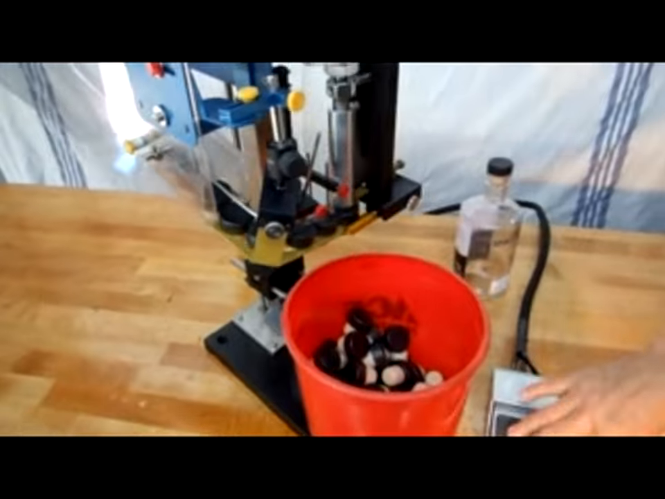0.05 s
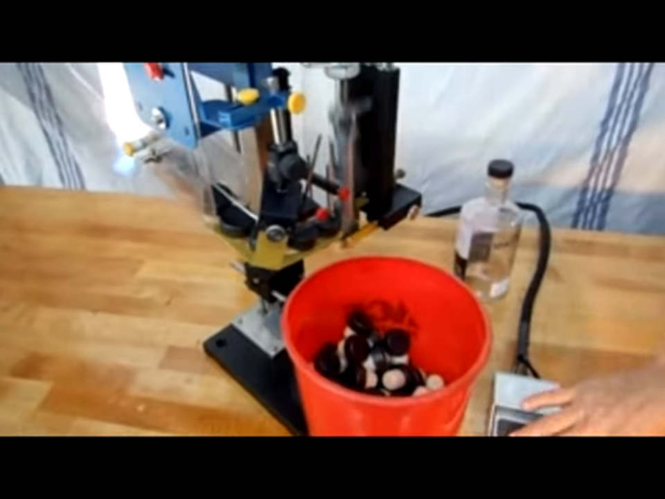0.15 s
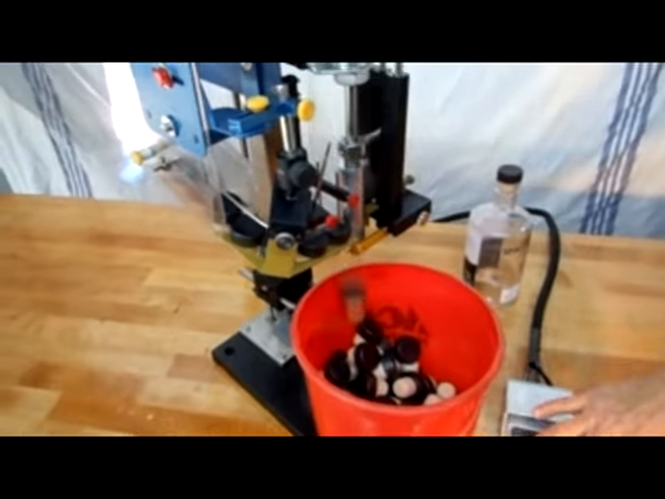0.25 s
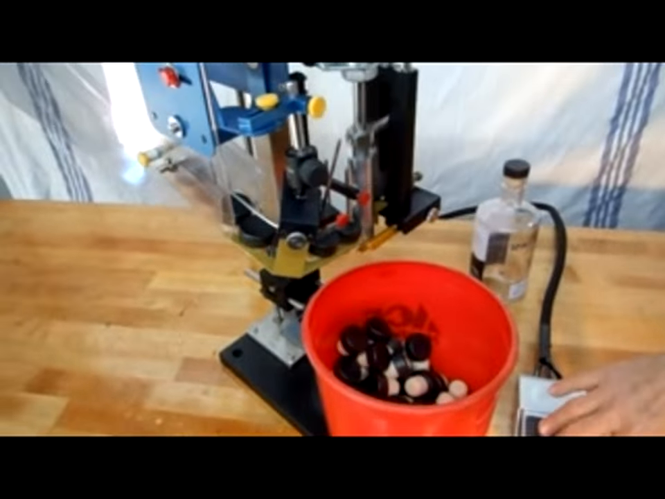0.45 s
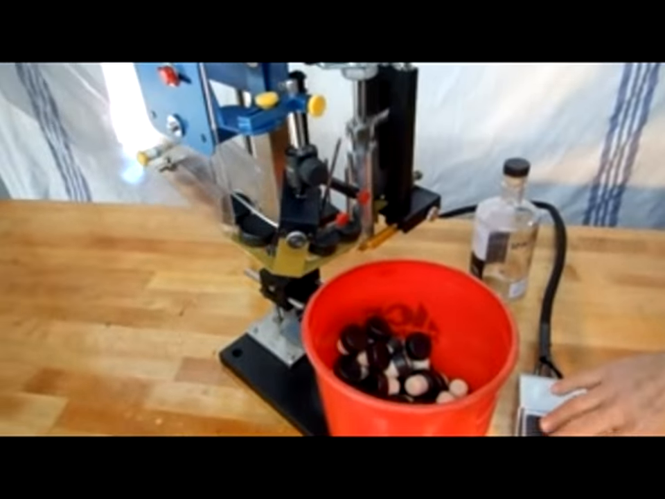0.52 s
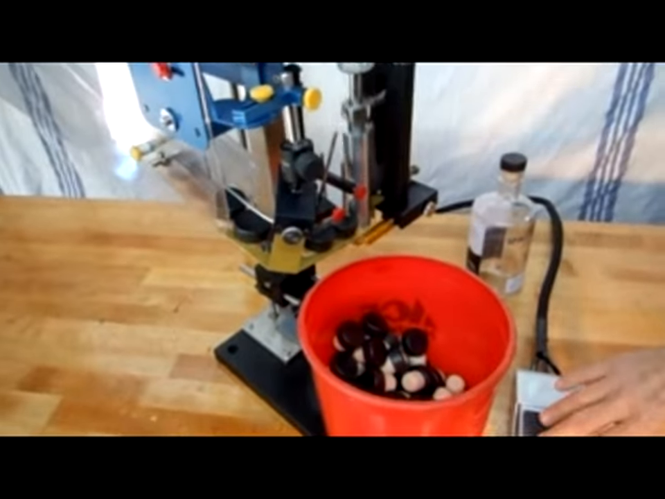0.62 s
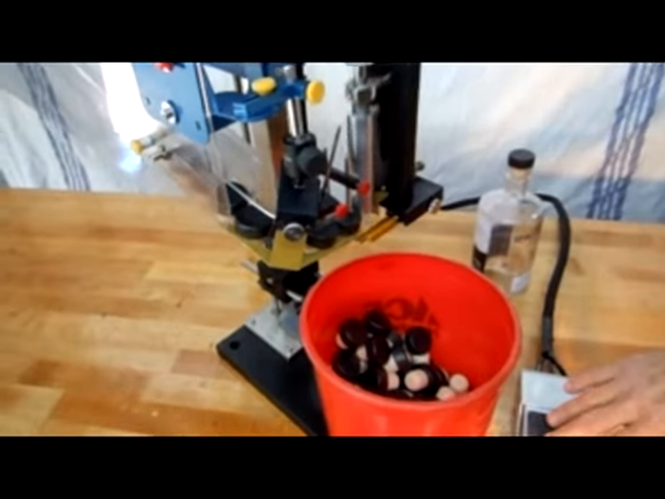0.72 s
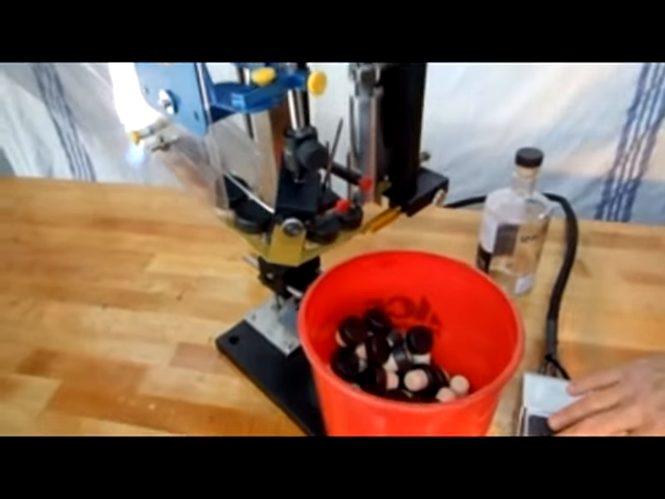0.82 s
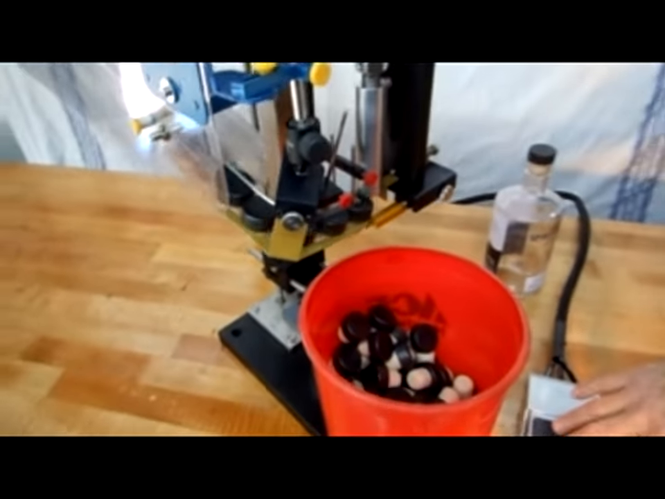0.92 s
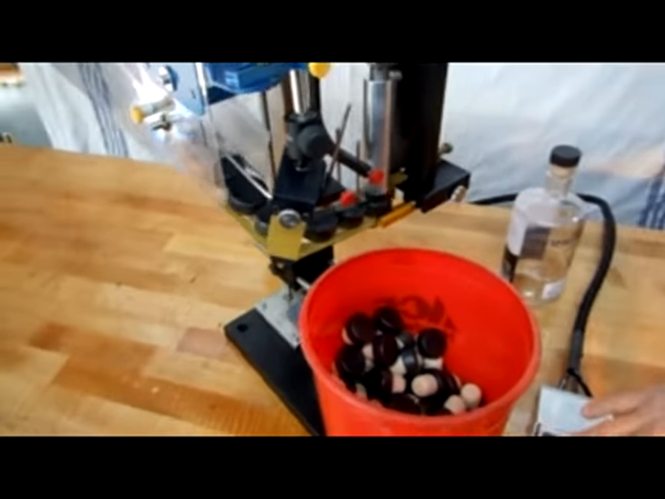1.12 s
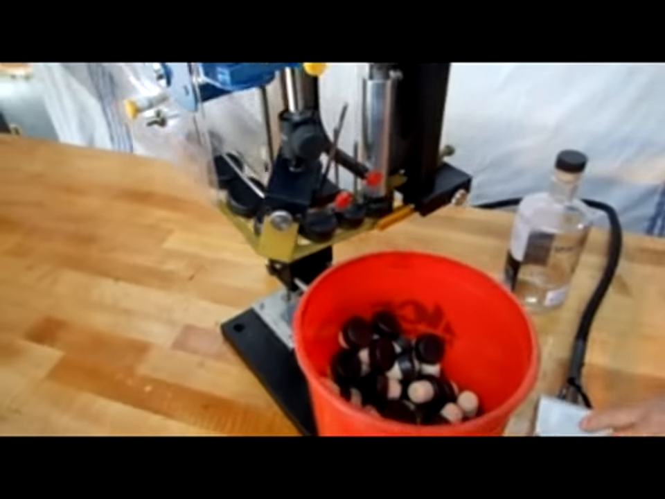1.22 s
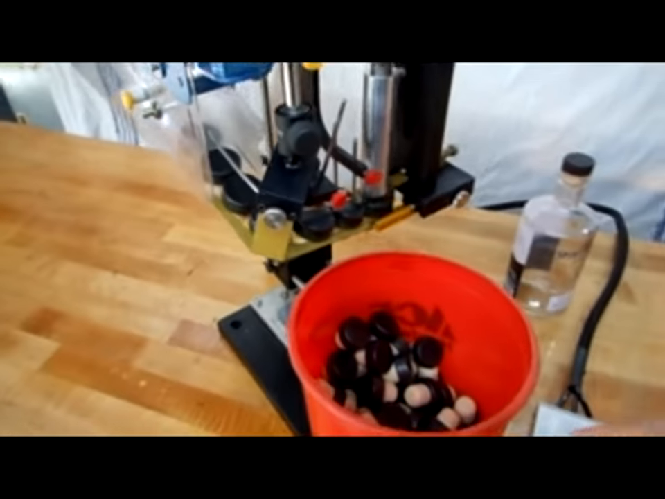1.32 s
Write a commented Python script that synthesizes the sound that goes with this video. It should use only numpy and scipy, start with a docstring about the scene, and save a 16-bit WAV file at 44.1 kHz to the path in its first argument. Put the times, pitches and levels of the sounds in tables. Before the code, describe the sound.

An air-driven corking machine cycles once, close by in a small room. Loose metal parts tick and briefly squeak, then air hisses at 0.2 seconds. Two hard metal knocks at 0.3 and 0.4 seconds shake the wooden table. At 0.5 seconds a bright puff vents with a thin whistle. From 0.9 seconds come soft clicks, light knocks, a faint low ring and rattling over quiet room noise.

```python
"""An air-driven corking machine on a wooden table runs through one stroke in a small room.
Loose metal parts rustle and tick over faint room noise, and the linkage squeaks. At 0.2 s air hisses
into the cylinder; the sliding ram knocks hard against its stops at 0.31 s and 0.38 s, shaking the table.
At 0.5 s a valve vents with a thin whistle. From 0.9 s a latch clicks, light knocks follow,
a low note lingers in the table and the loose parts rattle on."""
import sys
import numpy as np
from scipy import signal
from scipy.io import wavfile
from scipy.ndimage import uniform_filter1d

SR = 44100
rng = np.random.default_rng(int(sys.argv[2]) if len(sys.argv) > 2 else 0)


def store_wav(level_fs):
    """Save 16-bit WAV to argv[1]."""
    pcm = np.round(np.clip(np.atleast_2d(level_fs), -1, 1) * 32767)
    wavfile.write(sys.argv[1], SR, pcm.T.astype(np.int16))


N = 59535
T = np.arange(N) / SR
CONTACT_S = 0.00017  # rise time of a metal impact


def from_db(db):
    """Amplitude grows tenfold for every 20 dB."""
    return 10 ** (np.asarray(db) / 20)


def at_hz(curve, hz):
    """Interpolation on a logarithmic frequency axis."""
    freqs, values = np.transpose(curve)
    return np.interp(np.log(hz), np.log(freqs), values)


def envelope(rows):
    """Straight lines in decibels give exponential swells and fades."""
    return from_db(np.interp(T, *np.transpose(rows)))


def flicker(rate_hz):
    """Smoothed white noise gives a slow random fluctuation of unit deviation."""
    size = max(2, int(SR / rate_hz))
    slow = rng.standard_normal(N)
    for _ in range(2):
        slow = uniform_filter1d(slow, size, mode="wrap")
    return slow / slow.std()


def decay(start_s, attack_s, t60_s):
    """Damping: after a linear rise the level falls 60 dB in each t60_s."""
    age = np.maximum(T - start_s, 0)
    return np.minimum(age / attack_s, 1) * from_db(-60 * age / t60_s)


def bands(colour, width):
    """Spectral shaping: half-octave bands of stereo noise as (hz, signal), their powers summing to 1."""
    edges = 25 * 2 ** np.arange(0, 9.6, .5)
    white, out = rng.standard_normal((2, 2, N)), []
    for k, (low, high) in enumerate(zip(edges, edges[1:])):
        hz = np.sqrt(low * high)
        band_pass = signal.butter(2, [low, high], "band", fs=SR, output="sos")
        mid, side = signal.sosfilt(band_pass, white[k % 2])
        spread = from_db(at_hz(width, hz))
        stereo = (mid + spread * side * [[1], [-1]]) / np.hypot(1, spread)
        out.append((hz, from_db(at_hz(colour, hz)) * stereo))
    total = np.sqrt(sum(np.mean(band ** 2) for _, band in out))
    return [(hz, band / total) for hz, band in out]


def resonance(x, hz, width_hz):
    """A two-pole resonator passes a narrow band with unit gain at its peak."""
    radius = np.exp(-np.pi * width_hz / SR)
    feedback = [1, -2 * radius * np.cos(2 * np.pi * hz / SR), radius ** 2]
    return signal.lfilter(np.array([1, 0, -1]) * (1 - radius ** 2) / 2, feedback, x)


def noise(colour, width, peaks=(), tilt_db_per_octave=0):
    """Source and filter: coloured stereo noise lifted by resonances, at unit rms."""
    x = sum(band * from_db(tilt_db_per_octave * np.log2(hz)) for hz, band in bands(colour, width))
    for hz, width_hz, db in peaks:
        x = x + from_db(db) * resonance(x, hz, width_hz)
    return x / x.std()


def struck(hits, modes, attack_s, vary_db):
    """Modal superposition: each hit excites every mode as a damped sine of slightly random strength."""
    out = np.zeros(N)
    for start_s, hit_db in hits:
        age = T[:N - int(start_s * SR)]
        rise = np.minimum(age / attack_s, 1)
        for k, (hz, mode_db, t60_s) in enumerate(modes):
            level_db = hit_db + mode_db + vary_db * rng.standard_normal() - 60 * age / t60_s
            out[N - len(age):] += (-1) ** k * rise * from_db(level_db) * np.sin(2 * np.pi * hz * age)
    return out


# stereo width of the room noise, also of the parts, rub and whistle: frequency_hz, side_minus_mid_db
SCENE_WIDTH = [(60, -16.5), (2200, -32), (3300, -11), (5000, -18.5), (9000, -8), (14000, -6.5)]
# spectrum of the room noise: frequency_hz, density_db
ROOM_COLOUR = [(25, -13), (60, 2), (85, -18), (125, 2), (175, -8), (260, 3.5), (500, -3), (1000, 3),
               (1800, -3), (2800, -2), (5000, -12), (14000, -8)]
def room_noise():
    """Stationary noise forms a faint, even background."""
    return from_db(-51.5) * noise(ROOM_COLOUR, SCENE_WIDTH)


def reverberation(x, level_db=-18, dull_hz=3520):
    """Diffuse reflections: convolution with decaying noise adds a short, dull tail."""
    mid, side = rng.standard_normal((2, N)) * decay(start_s=0.0012, attack_s=0.0014, t60_s=0.16)
    tail = mid + from_db(-37) * side * [[1], [-1]]
    tail = signal.sosfilt(signal.butter(1, dull_hz, fs=SR, output="sos"), tail)
    tail /= np.sqrt(np.sum(tail ** 2) / 2)
    return from_db(level_db) * signal.fftconvolve(x, tail, axes=1)[:, :N]


# ticks of loose parts: start_s, level_db
PART_TICKS = [(0.013, -41), (0.043, -42), (0.087, -31), (0.113, -25.5), (0.165, -31), (0.1894, -22.5),
              (0.359, -15.5), (0.637, -45), (0.707, -43), (0.8376, -42.5), (1.01, -39), (1.044, -31.5),
              (1.0818, -31), (1.121, -33.5), (1.138, -35.5), (1.149, -39.5), (1.2012, -30.5),
              (1.229, -37.5), (1.246, -31.5), (1.2754, -35), (1.34, -31.5)]
# their rustle: time_s, level_db
PART_RUSTLE = [(0, -40), (0.07, -44), (0.12, -36), (0.3, -34), (0.48, -63), (0.62, -54.5), (0.95, -58.5),
               (1.03, -46.5), (1.14, -46.5), (1.18, -50), (1.24, -45), (1.35, -39.5)]
# their spectrum: frequency_hz, density_db
PART_COLOUR = [(100, -31), (500, -20), (1000, -3.5), (1900, -5.5), (3200, 3.5), (5400, -2), (9000, -3),
               (14000, 3)]
# their resonances: pitch_hz, bandwidth_hz, gain_db
PART_PEAKS = [(1170, 240, 0.5), (3150, 44, 4.5), (3446, 92, 4.5), (4820, 116, 3.5), (6230, 180, -3),
              (6720, 94, 8), (8250, 360, 8), (9580, 140, 10), (11070, 160, 1.5), (13000, 79, -4)]
def loose_parts():
    """Resonant filtering: short ticks and a rough rustle take their colour from the same metal parts."""
    bursts = sum(from_db(db) * decay(start_s, attack_s=0.0018, t60_s=0.061) for start_s, db in PART_TICKS)
    ticks = bursts * noise(PART_COLOUR, SCENE_WIDTH, PART_PEAKS)
    roughness = from_db(3.3 * flicker(rate_hz=100))
    rustle = noise(PART_COLOUR, SCENE_WIDTH, PART_PEAKS, tilt_db_per_octave=-3.5)
    return ticks + envelope(PART_RUSTLE) * roughness * rustle


# rub of the sliding ram: time_s, level_db
RUB_LEVELS = [(0, -44), (0.17, -48), (0.25, -40.5), (0.41, -30), (0.45, -38), (0.5, -34.5), (0.54, -49.5),
              (0.62, -58), (0.95, -73.5), (1.0, -53.5), (1.28, -48.5), (1.3, -48.5), (1.35, -47.5)]
# its spectrum: frequency_hz, density_db
RUB_COLOUR = [(50, -18), (120, -3.5), (180, -4), (260, -2), (450, 2), (1100, 2.5), (1900, -2), (2900, 1.5),
              (5500, -21.5), (14000, -43)]
# resonances under it: pitch_hz, bandwidth_hz, gain_db
RUB_PEAKS = [(125.1, 8.7, 16), (257.5, 19, 5.5), (363, 134, 0.5), (940, 57, -0.5)]
def ram_rub():
    """Sliding friction makes a dull noise that drives low resonances."""
    return envelope(RUB_LEVELS) * noise(RUB_COLOUR, SCENE_WIDTH, RUB_PEAKS)


# clicks of the latch: start_s, level_db
LATCH_HITS = [(0.8938, -37), (0.911, -46), (1.318, -37)]
# its modes: pitch_hz, level_db, t60_s
LATCH_RING = [(2230, 1, .025), (2900, -1.5, 0.025), (3500, 3, 0.016), (6530, 1, .018)]
def latch():
    """Heavy damping shortens the latch's ring to a compact click."""
    return struck(LATCH_HITS, LATCH_RING, CONTACT_S, vary_db=1.0)


# squeak of the linkage: start_s, level_db
LINKAGE_SQUEAK = [(0.176, -24)]
# its modes: pitch_hz, level_db, t60_s
LINKAGE_MODES = [(1300, -1, 0.02), (2500, -6, .015), (4900, 2, 0.03)]
def linkage_squeak():
    """Three damped, nearly harmonic modes blend into a brief squeak."""
    return struck(LINKAGE_SQUEAK, LINKAGE_MODES, CONTACT_S, vary_db=-6.0)


# clinks of small steel parts: start_s, level_db
CLINK_HITS = [(0.1895, -36), (0.3588, -22.5)]
# their modes: pitch_hz, level_db, t60_s
CLINK_RING = [(8650, -13, 0.15), (9440, 1.5, 0.054), (12460, 5, 0.028)]
def clinks():
    """Small, stiff steel parts have high natural frequencies."""
    return struck(CLINK_HITS, CLINK_RING, CONTACT_S, vary_db=3.5)


# thumps through the mount: start_s, table_db, hardness_db_per_octave, plate_db
MOUNT_THUMPS = [(0.205, -52, 0, -29), (0.3090, -28.5, 4.5, -28), (0.3850, -26.5, -2, -17),
                (0.974, -48, 1, -66), (1.290, -62, 0, -33)]
# modes of the wooden table: pitch_hz, level_db, t60_s
WOOD_MODES = [(110.7, -3.5, 0.27), (130, -3, 0.09), (244, 11, 0.1), (364, 10, 0.09)]
# modes of the base plate: pitch_hz, level_db, t60_s
PLATE_MODES = [(775, -15, .2), (900, 0, .096), (995, 1, .05), (1160, -4, .05)]
def table_and_plate(attack_s=0.009, note_start_s=0.975, note_hz=130):
    """Structure-borne sound: blows ring table and plate; harder ones favour the table's upper modes."""
    low_note = np.sin(2 * np.pi * note_hz * (note_start_s - T))  # lingers after the stroke
    out = from_db(-42) * decay(note_start_s, attack_s, t60_s=0.42) * low_note
    lowest_hz = WOOD_MODES[0][0]
    for start_s, table_db, hardness, plate_db in MOUNT_THUMPS:
        modes = [(hz, db + hardness * np.log2(hz / lowest_hz), t60_s) for hz, db, t60_s in WOOD_MODES]
        out += struck([(start_s, table_db)], modes, attack_s, vary_db=-0.5)
        out += struck([(start_s, plate_db)], PLATE_MODES, attack_s, vary_db=2.0)
    return out


# resonances of the air ports: pitch_hz, bandwidth_hz, gain_db
PORT_PEAKS = [(2430, 88, 1), (3050, 180, 3.5), (12400, 810, -8)]
def air_jet(colour, width, start_s, attack_s, hold_s, sag_db_per_s, release_db_per_s):
    """Turbulent jet noise rises as a valve opens, sags with the pressure and dies away."""
    age = np.maximum(T - start_s, 0)
    opening = 1 - np.exp(-age / attack_s)
    drop_db = sag_db_per_s * np.minimum(age, hold_s) + release_db_per_s * np.maximum(age - hold_s, 0)
    return opening * from_db(-drop_db) * noise(colour, width, PORT_PEAKS)


VENT_START_S = 0.5005
# spectrum of the vented air: frequency_hz, density_db
EXHAUST_COLOUR = [(100, -17), (500, -10), (1600, -1), (2600, 0.5), (4200, 1), (7000, 1.5), (10000, -4.5),
                  (12000, 10), (14000, 4)]
# its stereo width: frequency_hz, side_minus_mid_db
EXHAUST_WIDTH = [(100, -20), (2500, -24), (5000, -8), (9000, -7), (13000, 3.5)]
def vent():
    """Compressed air escapes in a short, bright puff of turbulence."""
    return from_db(-21.5) * air_jet(EXHAUST_COLOUR, EXHAUST_WIDTH, VENT_START_S, attack_s=0.0012,
                                    hold_s=0.052, sag_db_per_s=171, release_db_per_s=432)


def vent_whistle(delay_s=0.043, spread_s=0.02):
    """Narrow-band noise is heard as a pitch: the vent whistles briefly as its jet thins."""
    hiss = resonance(noise(EXHAUST_COLOUR, SCENE_WIDTH), hz=11600, width_hz=700)
    swell = np.exp(-((T - VENT_START_S - delay_s) / spread_s) ** 2)
    return from_db(-37) * swell * hiss / hiss.std()


# spectrum of the air entering the cylinder: frequency_hz, density_db
INLET_COLOUR = [(60, -20), (180, -12), (500, -3.5), (1000, 0), (2000, 0), (3300, 5.5), (6500, 0.5),
                (10000, 2), (14000, 2)]
# its stereo width: frequency_hz, side_minus_mid_db
INLET_WIDTH = [(100, 12), (1000, -2.5), (3000, -10.5), (6000, -1), (14000, -2)]
def cylinder_fill():
    """Turbulent flow into the cylinder makes a broadband hiss."""
    return from_db(-15.5) * air_jet(INLET_COLOUR, INLET_WIDTH, start_s=0.2055, attack_s=0.005,
                                    hold_s=0.075, sag_db_per_s=30, release_db_per_s=138)


# knocks of the ram and its linkage: start_s, crack_db, ring_db, tilt_db_per_octave, bass_db
RAM_KNOCKS = [(0.2052, -14.5, -44, -4.5, -25), (0.3081, -7, -7, 1.5, 8), (0.3195, -20, -17, -2, -22),
              (0.3836, -11, -9.5, 0.14, -9), (0.4742, -22, -42, -5, -22), (0.8925, -34, -54, -1, -30),
              (0.9935, -38, -37, -0.5, 6), (1.316, -35, -56, 1, -21)]
# spectrum of a knock's crack: frequency_hz, density_db
IMPACT_COLOUR = [(35, -10), (80, -10), (170, 1.5), (400, 0.5), (900, 0), (1500, 1.5), (2700, 6.5),
                 (4000, -0.5), (7000, -0.5), (10000, -2.5), (14000, -5.5)]
# its decay times: frequency_hz, t60_s
IMPACT_T60 = [(100, 0.091), (700, 0.12), (2500, 0.047), (7000, 0.068), (14000, 0.01)]
# its stereo width: frequency_hz, side_minus_mid_db
IMPACT_WIDTH = [(40, 2), (200, -19), (1000, -22), (6000, -8), (13000, -5.5)]
# modes of the steel frame: pitch_hz, level_db, t60_s
FRAME_MODES = [(615.4, -20, 0.25), (1314, -17, 0.095), (2080, -21, 0.11), (2184, -6, 0.052),
               (2292, 7, 0.029), (2440, -10, 0.071), (2812, -28, 0.17), (2980, -26, 0.27), (3490, -22, 0.1),
               (4485, -33, 0.26)]
# hard first contacts with the steel stop: start_s, level_db
STOP_SNAPS = [(0.3084, -0.5), (0.3840, -22), (0.9920, -33.5)]
# modes of the stop: pitch_hz, level_db, t60_s
STOP_MODES = [(2970, -10, 0.018), (6600, 2.5, 0.0049), (7220, 0.5, 0.005)]
def ram_knocks(bass_hz=580):
    """Impact excites a wide band: the stop snaps, a crack dies fastest in the treble, the frame rings."""
    crack = 0
    for hz, band in bands(IMPACT_COLOUR, IMPACT_WIDTH):
        octaves = np.log2(max(hz, 700) / 2000)  # the tilt pivots at 2 kHz and is flat below 700 Hz
        bass_share = 1 / (1 + (hz / bass_hz) ** 2)
        for start_s, crack_db, _, tilt, bass_db in RAM_KNOCKS:
            gain = from_db(crack_db + tilt * octaves + bass_db * bass_share)
            crack += gain * decay(start_s, CONTACT_S, at_hz(IMPACT_T60, hz)) * band
    frame_hits = [(start_s, ring_db) for start_s, _, ring_db, _, _ in RAM_KNOCKS]
    ring = struck(frame_hits, FRAME_MODES, CONTACT_S, vary_db=1.0)
    snap = struck(STOP_SNAPS, STOP_MODES, attack_s=0.0003, vary_db=1.0)
    return crack + ring + snap


def scene():
    """Superposition: the machine and its reverberation add to table, loose parts, rub and room noise."""
    air = cylinder_fill() + vent() + vent_whistle()
    machine = air + ram_knocks() + clinks() + linkage_squeak() + latch()
    rub = ram_rub()
    return machine + reverberation(machine) + table_and_plate() + loose_parts() + rub + room_noise()


def record(dry):
    """The balance leans slightly right, soft saturation rounds the peaks and a low-pass cuts the top."""
    right_lead_db, ceiling, cutoff_hz = 0.53, 1.15, 14250
    panned = dry * from_db(right_lead_db * np.array([[-.5], [.5]]))
    low_pass = signal.ellip(12, .1, 80, cutoff_hz, fs=SR, output="sos")
    return signal.sosfilt(low_pass, ceiling * np.tanh(panned / ceiling))


dry = scene()
out = record(dry)
store_wav(out)
```